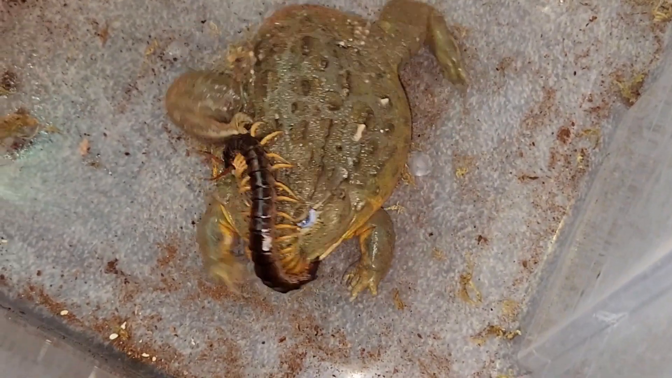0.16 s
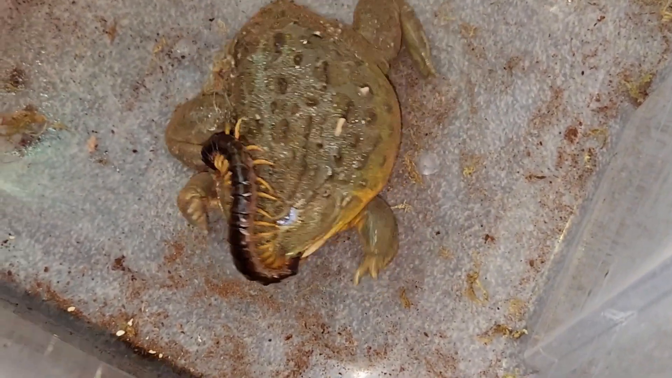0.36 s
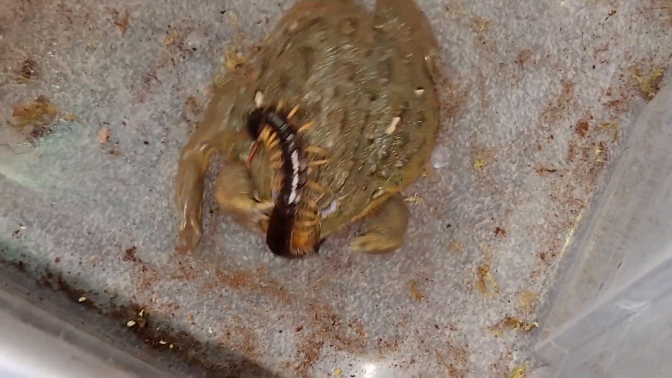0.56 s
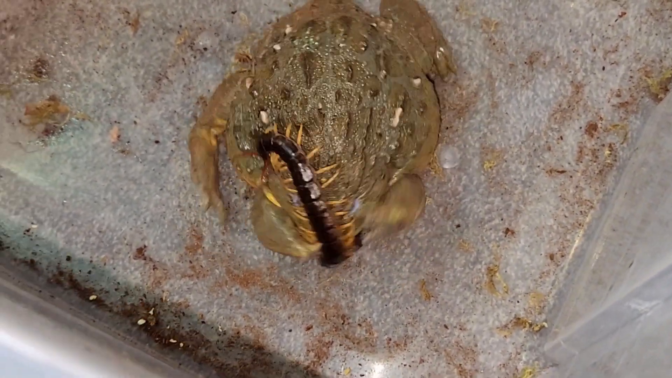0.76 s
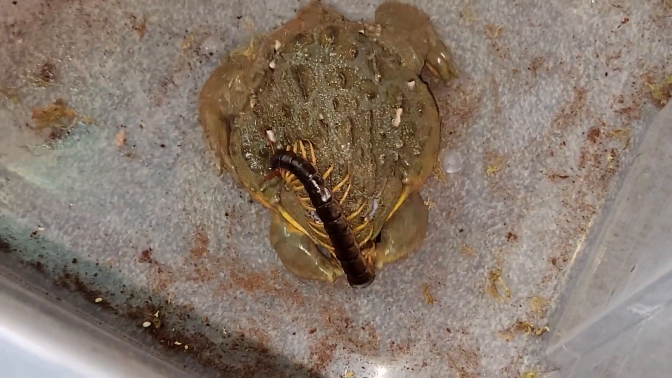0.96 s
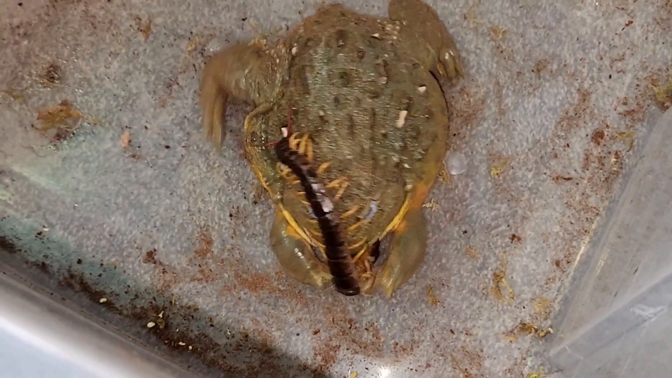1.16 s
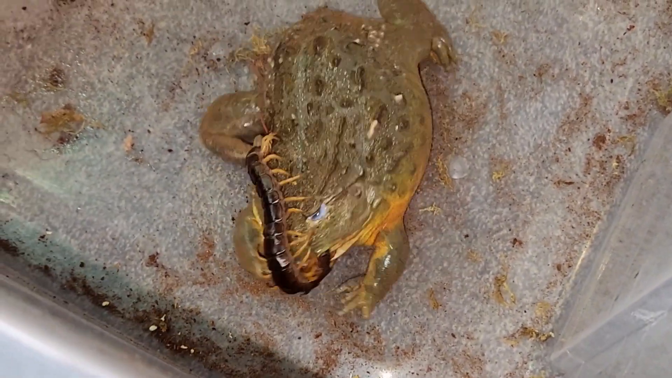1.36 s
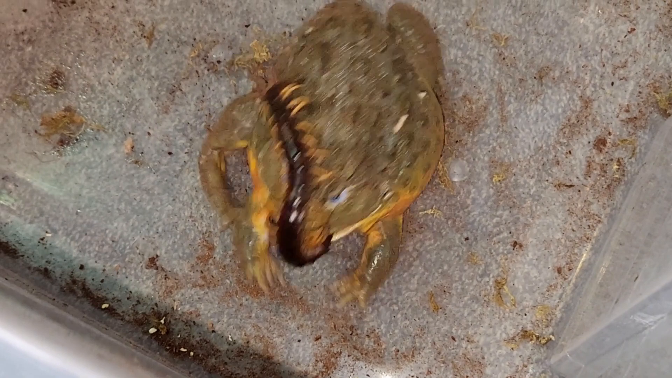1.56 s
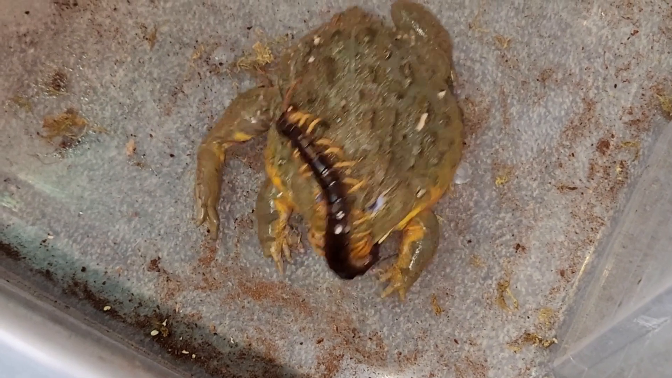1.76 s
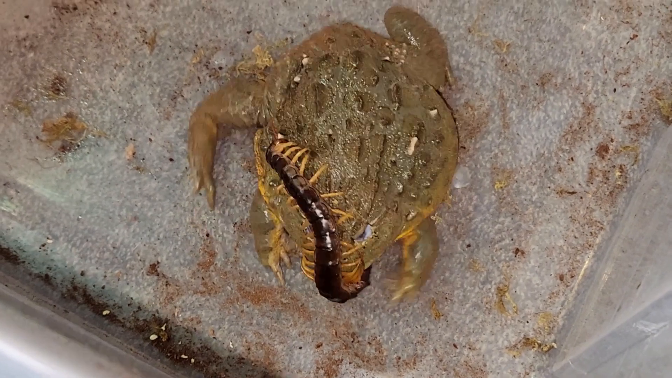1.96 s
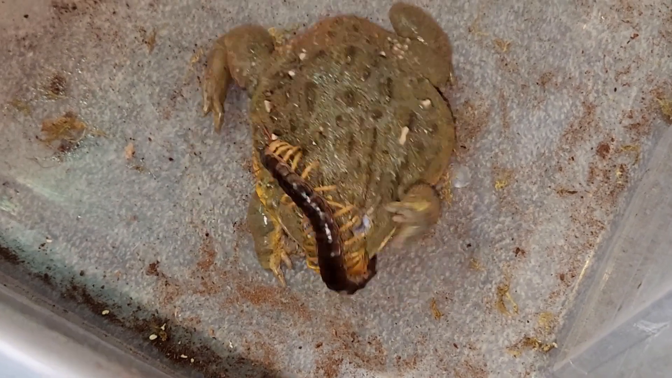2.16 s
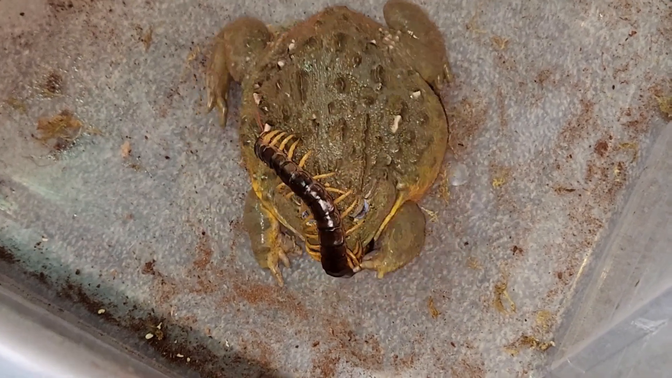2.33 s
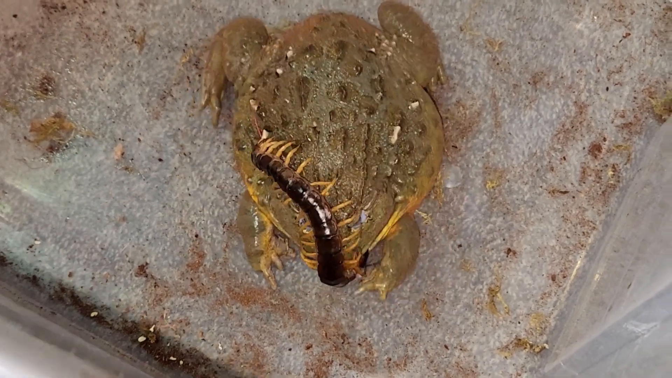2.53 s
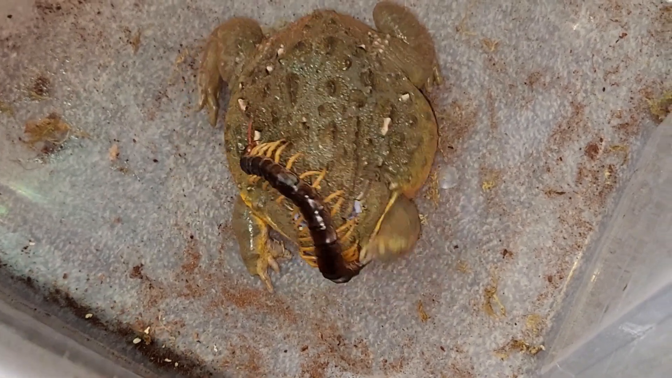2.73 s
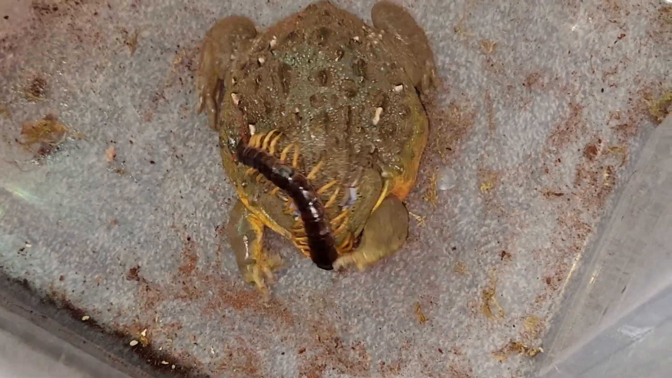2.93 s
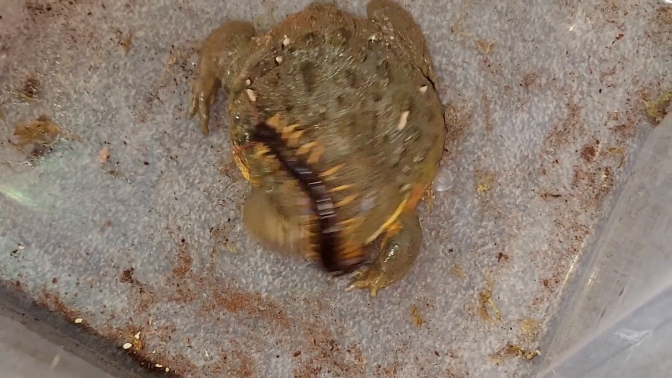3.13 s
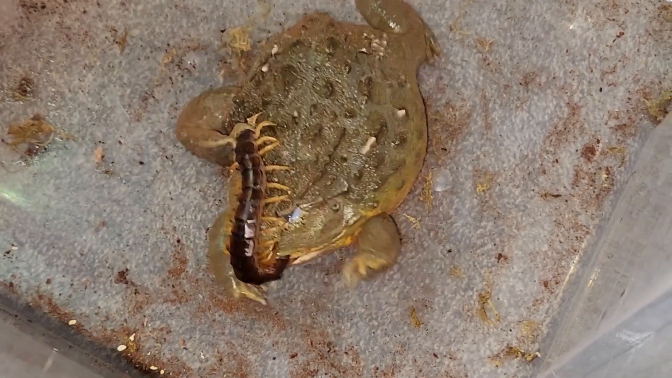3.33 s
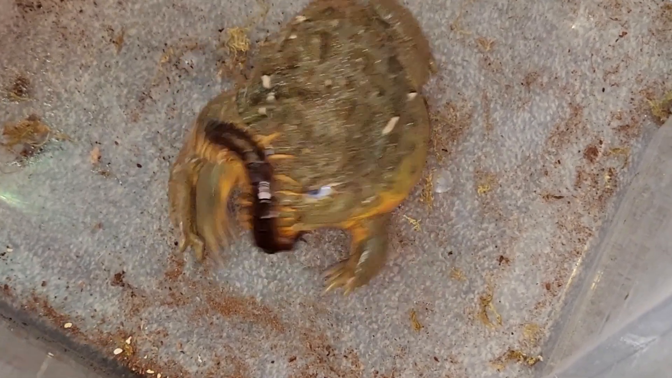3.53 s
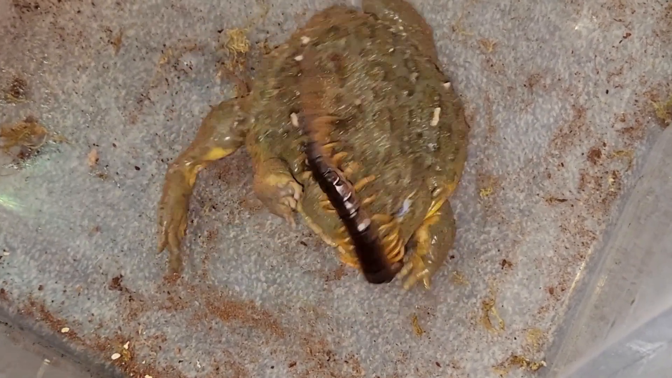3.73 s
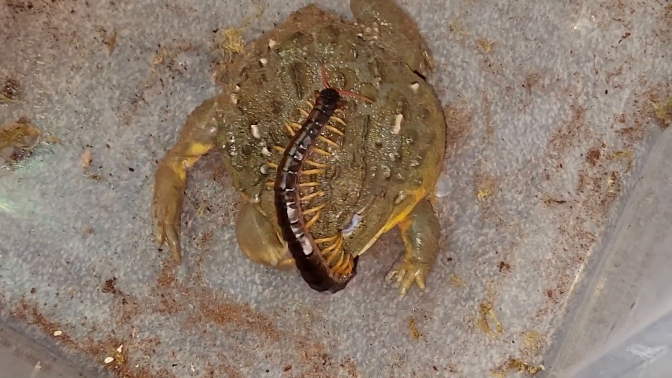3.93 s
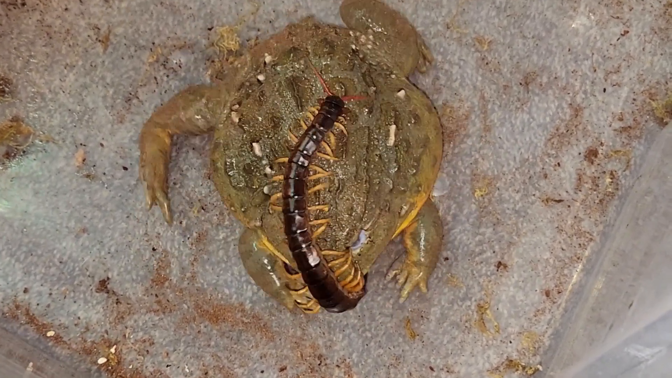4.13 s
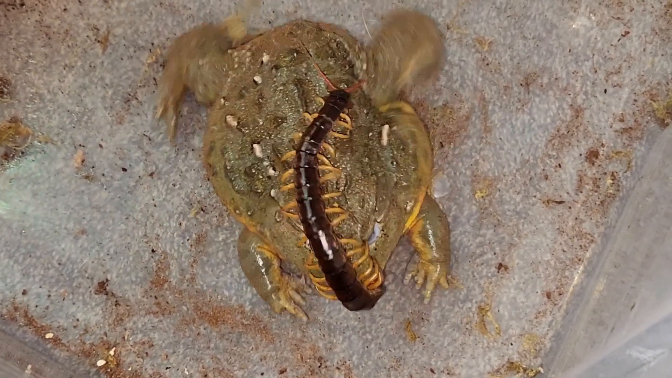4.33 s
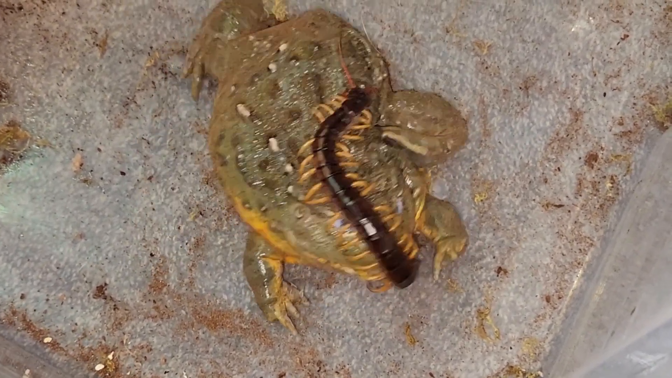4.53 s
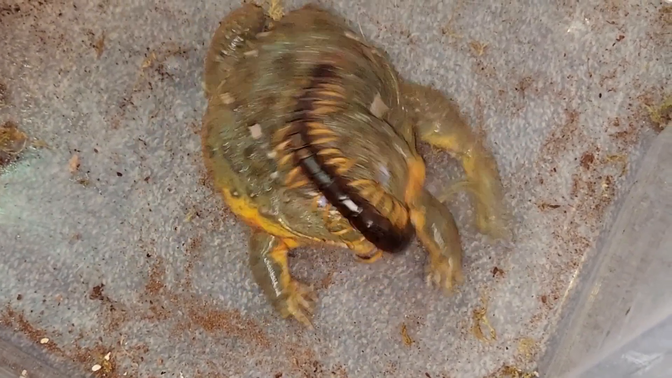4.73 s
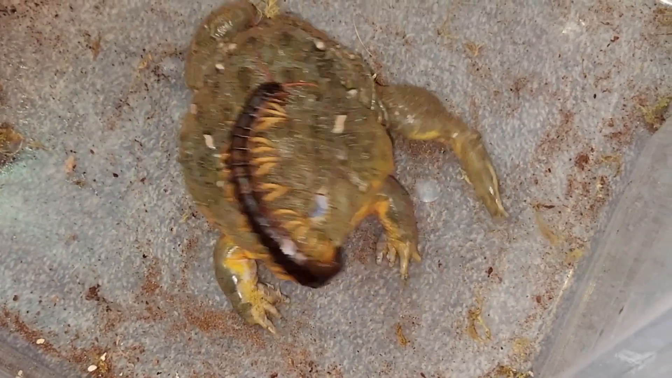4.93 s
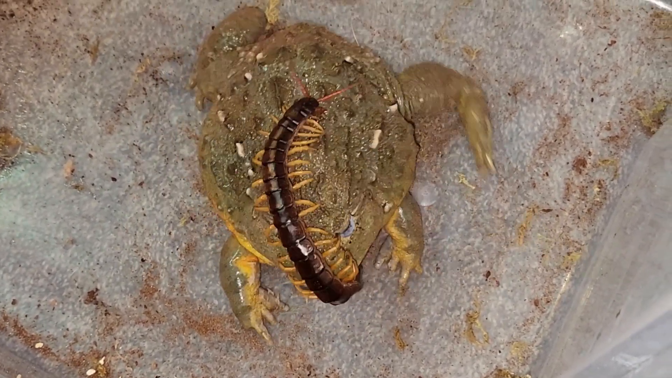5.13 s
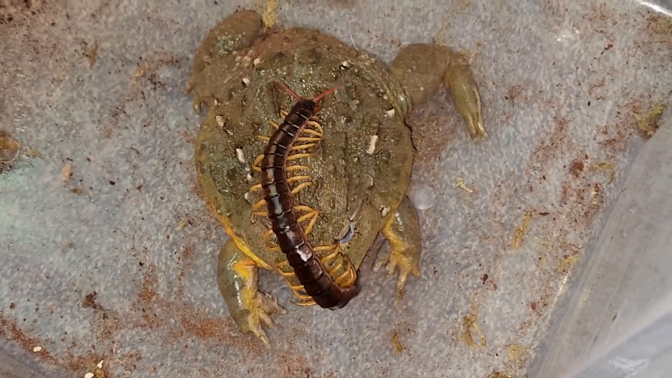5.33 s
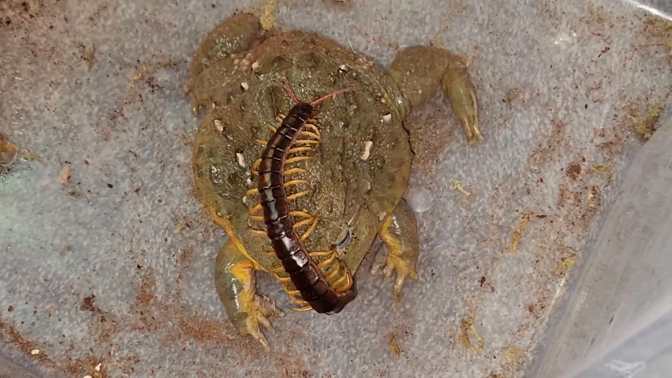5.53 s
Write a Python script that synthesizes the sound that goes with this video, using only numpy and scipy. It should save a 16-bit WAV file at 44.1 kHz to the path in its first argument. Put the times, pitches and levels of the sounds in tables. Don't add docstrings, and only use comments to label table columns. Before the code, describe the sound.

Close phone sound of a frog's body bumping a thin plastic floor: low, boxy, quickly damped thuds with crisp limb slaps, toe ticks, cracking grit and damp skin rasps. Activity comes in three uneven flurries separated by near-quiet with soft handling rumble. A distant machine hums very low, slightly clearer towards the end. Small enclosed space, short wall reflection, no voice.

```python
import sys
import numpy as np
from scipy import signal
from scipy.fft import rfft, irfft, next_fast_len
from scipy.io import wavfile
from scipy.ndimage import uniform_filter1d

SR = 44100
rng = np.random.default_rng(int(sys.argv[2]) if len(sys.argv) > 2 else 0)


def file_out(sig):
    cols = np.atleast_2d(sig).T
    lim = np.clip(cols, -1, 1)
    pcm = np.round(lim * 32767).astype(np.int16)
    wavfile.write(sys.argv[1], SR, pcm)


def boost_factor(decibels):
    exponent = np.asarray(decibels, float) / 20
    return 10 ** exponent


N = 250929

# freq_hz, density_db
SHUT_FLOOR = [(90, -32), (130, -5), (165, -17), (222, -7.5), (300, -11), (450, -13), (600, -16.5),
              (860, -13), (2000, -25.5), (6500, -30), (7900, -28.5), (8800, -38.5), (9400, -51.5),
              (10800, -50.5), (11700, -26.5), (12800, -22.5), (13800, -33.5), (15500, -32.5)]
SHUT_FLOOR_DB = -69.5

# time_s, pitch_hz, level_db
LOWER_HUM = [(0, 69.9, -64), (.5, 71.42, -54.5), (.7, 70.04, -58.5), (.93, 69.24, -50.5),
             (1.15, 68.7, -53.5), (1.25, 70.62, -57), (1.8, 68.84, -59), (2.55, 67.44, -68),
             (3.0, 70, -66.5), (4.08, 67.04, -58.5), (4.3, 67.8, -48.5), (4.63, 67.33, -52),
             (4.85, 68.64, -43), (5.04, 66.85, -52), (5.17, 69.3, -48.5), (5.39, 67.34, -44.5),
             (5.69, 67.9, -47.5)]
UPPER_HUM_HZ, UPPER_WAVER_RAD = 109, 0.4
UPPER_START_S, UPPER_RISE_S, UPPER_FROM_DB, UPPER_DB = 4.05, 0.47, -62, -52
DRONE_DB, DRONE_OVER_HUM_DB, RUMBLE_DB = -65, -11.5, -61

# middle_s, length_s, level_db, casing_hz
GRIPS = [(0, 0.17, -53, 92), (.18, 0.11, -50, 45.4), (0.313, 0.073, -42.5, 60.6), (0.664, 0.09, -52, 70.6),
         (1.483, 0.16, -69, 36), (1.877, 0.18, -42.5, 53.3), (1.994, 0.14, -46, 60), (2.096, 0.12, -46, 42),
         (2.266, 0.074, -49.5, 76), (2.201, 0.25, -48, 56), (2.423, 0.16, -51, 39.8),
         (3.757, 0.55, -52.5, 62.2), (5.006, 0.2, -59, 47.3), (5.308, 0.15, -57, 36.4)]
GRIP_RUMBLE_DB, GRIP_DRONE_DB, GRIP_LEFT_DB = -6.5, -12.5, -7

# freq_hz, density_db
OPEN_HISS = [(1500, -25.5), (2800, 4.5), (3500, 3), (4500, 3), (6500, -2), (7600, 4), (8500, -3),
             (10200, -5), (11600, 1.5), (15000, 2.5), (16200, -14.5)]

# freq_hz, likeness_share
PORT_LIKENESS = [(200, 0.9), (700, 0.79), (1100, 0.11), (1700, 0.058), (6000, 0.03), (8000, 0.585),
                 (11000, 0.48), (12500, 1), (15000, .85)]
# freq_hz, left_minus_right_db
PORT_TILT = [(100, 1), (400, 2), (1000, 2.5), (2000, -1), (2600, 6.5), (4500, 1), (8000, 11), (9800, 9),
             (11500, 6), (15000, 0)]

# time_s, gain_db
WALL_ECHO = [(0, -9.5), (1, -8), (2, -17), (3.5, -23), (5.69, -16.5)]
WALL_MS = 1.474

# middle_s, length_s, level_db, pitch_hz
RASPS = [(.06, .15, -54, 872), (.11, .14, -59, 2340), (0.266, .11, -59, 2730), (0.281, 0.12, -57, 890),
         (.76, .17, -64.5, 315), (0.883, 0.05, -47, 796), (0.915, .11, -60, 2600), (.921, .041, -50, 7310),
         (1.057, 0.15, -68, 326), (1.548, .051, -55, 14100), (1.562, 0.05, -48, 610),
         (1.601, 0.053, -56, 1400), (1.719, .09, -62.5, 270), (1.938, 0.19, -61, 1160),
         (2.093, .09, -64.5, 905), (3.171, 0.1, -58, 180), (3.23, .11, -60, 705), (3.277, 0.063, -59, 3110),
         (3.723, .14, -58.5, 212), (4.335, 0.17, -49.5, 795), (4.333, 0.15, -65, 4510),
         (4.35, 0.15, -52.5, 1480), (4.36, 0.095, -60, 3040), (4.421, .11, -57, 530),
         (4.433, 0.038, -63, 3210), (4.49, 0.15, -54, 5250), (4.86, .14, -53.5, 1570),
         (4.956, 0.12, -65, 460), (5.11, .13, -69, 2930), (5.218, 0.15, -47, 266),
         (5.225, 0.18, -56.5, 547), (5.21, 0.18, -60, 2200), (5.551, .12, -55.5, 1670),
         (5.554, .08, -74, 7900), (5.571, .021, -65, 12910), (5.58, 0.11, -60, 970),
         (5.577, 0.12, -61.5, 2265), (5.585, .031, -75, 8810), (5.591, 0.12, -77, 12610),
         (5.592, .11, -76, 6100), (5.606, .06, -72, 4810)]
RASP_WIDTH_SHARE = 0.19

# start_s, hold_s, drag_db, grit_over_drag_db, hiss_db
KICKS = [(.255, 0.049, -57.5, 0.5, -59.5), (.352, 0.035, -50.5, 3, -58), (.465, 0.038, -60.5, 7, -59.5),
         (.54, 0.022, -47, 3, -54), (.705, 0.022, -66, 5, -62.5), (.845, 0.11, -55, 3, -59),
         (1.24, 0.059, -53, 1.5, -60.5), (1.36, 0.04, -58.5, 3, -62.5), (1.495, 0.1, -53, 1.5, -58.5),
         (1.61, 0.095, -52, 1.5, -62), (3.03, .04, -57.5, -6, -65.5), (3.13, 0.013, -58.5, -8, -76.5),
         (3.195, 0.085, -55.5, -1.5, -63.5), (3.3, 0.037, -59, 2.5, -60.5), (3.462, 0.016, -52, -15, -64),
         (3.51, 0.038, -48.5, 1, -55.5), (3.64, 0.054, -58, 3, -59.5), (3.74, 0.048, -65, 2.5, -66.5),
         (4.275, .12, -48.5, -14, -61.5), (4.42, 0.081, -57.5, 6, -59.5), (4.762, 0.051, -57, 9, -53.5),
         (4.89, 0.02, -53.5, -3, -59.5), (5.16, 0.1, -55, 2, -65.5), (5.52, 0.11, -68, 7, -95)]
KICK_RISE_DB_PER_S, KICK_FALL_DB_PER_S = 402.5, 421.5
# start_s, hold_s, drag_db, grit_over_drag_db, hiss_db
SLIDES = [(0, 0.034, -49, -1.5, -59.5), (.09, .08, -53.5, 6.5, -60), (.57, 0.044, -54, 2.5, -63),
          (1.09, 0.052, -60.5, 1.5, -66), (1.88, 0.15, -60.5, 0.5, -65), (2.06, 0.06, -54.5, -12, -69),
          (2.2, 0.32, -91, 0, -81), (2.95, 0.08, -70.5, 3.5, -73), (2.38, 0.03, -69, -0.5, -74.5),
          (3.39, 0.017, -72, -3, -73.5), (3.59, 0.017, -59.5, 0, -62), (3.9, 0.095, -83.5, 7, -74),
          (4.04, 0.081, -60, -0.5, -67), (.76, 0.027, -66.5, 3.5, -67.5), (4.97, 0.089, -62.5, -4, -71.5),
          (1.32, 0.015, -58.5, -1, -65.5), (4.6, 0.0067, -63, -2.5, -68), (4.69, 0.076, -55.5, -2.5, -62.5),
          (4.83, 0.054, -59.5, 0.5, -68), (5.09, 0.079, -55, -1, -68)]
SLIDE_RISE_DB_PER_S, SLIDE_FALL_DB_PER_S = 154, 193
REST_DRAG_DB, REST_GRIT_DB, REST_WEIGHT_DB, REST_HISS_DB = -78.5, -77.5, -72, -79
WEIGHT_DB, WEIGHT_SHARE = 2.5, 0.18

# freq_hz, width_hz, level_db
RUBBED_MODES = [
    [(217.7, 37, 8.5), (284, 31, -7), (429, 110, 8)],
    [(574, 34, 1), (743.5, 53, 1.5), (879, 150, 7), (1020, 36, -16.5)],
    [(1490, 230, 1.5), (1670, 270, 13.5), (2150, 770, 9), (2770, 450, -21.5), (3200, 500, 0)],
]
# low_hz, high_hz
RUB_BANDS = [(150, 371.5), (430, 1120), (1050, 3280)]

# time_s, peak_db, ring_hz, snap_db, t60_ms
SLAPS = [(0.144, -42, 1500, -23, 49), (.356, -39, 1420, 11.5, 33), (0.4608, -21.5, 5600, -7, 25.4),
         (0.5432, -12, 1000, -3, 10.4), (0.5443, -13, 1840, -1.5, 10), (.549, -33, 1490, -2, 39),
         (1.268, -36, 590, -5.5, 55), (1.4805, -26, 2490, -8, 21), (1.537, -33, 1020, -6, 60),
         (1.633, -53, 1650, 12.5, 64), (1.678, -38, 1300, -7, 110), (1.699, -29.5, 1320, -19, 15),
         (3.026, -29.5, 1190, -16.5, 20.6), (3.315, -36.5, 755, -5, 34), (3.466, -37.5, 980, -13, 24),
         (3.51, -35.5, 4800, -4, 30), (3.515, -28.5, 880, -6.5, 53), (3.523, -37.5, 1650, -0.5, 29),
         (3.535, -40.5, 5500, -16, 57), (4.458, -31.5, 1330, -8, 17), (4.603, -37, 560, -30, 33),
         (4.736, -43.5, 2120, 10.5, 12), (4.761, -40, 1700, 2.5, 82), (4.771, -28, 540, -5.5, 31),
         (4.8, -41.5, 3740, -17, 48)]
RISE_SHARE = 0.03
SLAP_BRIGHT_DB = -23.5
# time_s, peak_db, ring_hz, bright_db
TOES = [(.523, -41, 960, -14), (0.827, -53, 1360, -26), (.855, -53, 750, 1), (.889, -46, 745, -7),
        (0.97, -58, 2350, -3), (1.183, -43.5, 2320, -16), (1.361, -39, 2660, -33), (1.475, -46, 2400, -28),
        (1.583, -39, 1400, -27), (2.39, -58, 600, -12), (3.135, -47, 1395, -27), (3.135, -54, 800, -30),
        (2.907, -66, 850, -12), (3.2, -44, 800, -22), (3.389, -49, 2300, -17), (3.494, -38.5, 2720, -7),
        (3.565, -36, 736, -26), (4.603, -42, 1280, -23), (5.521, -60.5, 5520, -27)]
TOE_SNAP_DB, TOE_T60_MS = -21, 22
# time_s, peak_db
GRIT = [(0.4616, -32.5), (.92, -51.5), (1.539, -45.5), (3.011, -58), (3.25, -55.5), (3.276, -55),
        (3.1992, -59), (4.802, -54), (0.669, -57.5), (0.703, -51), (0.719, -52.5), (0.738, -56.5),
        (.692, -69), (2.292, -58.5), (2.907, -65.5), (2.934, -66), (3.017, -53.5), (3.938, -62),
        (3.976, -64), (3.994, -57)]
GRIT_HZ, GRIT_SNAP_DB, GRIT_BRIGHT_DB, GRIT_T60_MS = 6060, -11, 2, 23
# low_hz, high_hz
TICK_BANDS = [(600, 4330), (5500, 13700)]

# time_s, peak_db, rocking_db, deep_db, upper_db
THUMPS = [(0.355, -38.5, -20, -10, 4), (0.46, -37, 0, -11, 2), (0.5237, -29.5, -22, -24, 4),
          (0.533, -24, 7, -3, 2), (0.546, -24, -4, 7, 9), (0.578, -51, -11, 4, 9),
          (1.268, -17, -2, 2.5, 7.5), (1.465, -33.5, -9, 12, 6), (1.537, -16, 6.5, 8, -3),
          (1.577, -29, -14, 18, -3.5), (1.679, -40.5, -13.5, -15, 3.5), (3.017, -44, -10, -5, 2.5),
          (3.0273, -12, -3, 6.5, 9), (3.313, -27.5, 4.5, 8, -11), (3.439, -22, -18, -11, 5),
          (3.465, -22.5, 5, 8.5, 9), (3.514, -12, 5.5, 10, 5), (3.56, -29.5, 16.5, 11, -3.5),
          (4.078, -41.5, -21, 15, 6), (4.604, -44.5, -20, -10, 38), (4.669, -44, -10, 21, 0),
          (4.7405, -25, -19, 7.5, -13.5), (4.7735, -21.5, -32, -25, 5), (4.888, -40.5, -14, 11, -7)]
# freq_hz, level_db, t60_s
ROCKING_MODES = [(85.1, -8.5, 0.38)]
# freq_hz, level_db, t60_s
DEEP_MODES = [(135.7, -2, .18), (107.7, -16.5, 0.3)]
# freq_hz, level_db, t60_s
MAIN_MODES = [(205.4, 14.5, 0.069), (220, -23.5, .08)]
# freq_hz, level_db, t60_s
UPPER_MODES = [(262, -16, 0.2), (325.4, -16, 0.15), (389.5, 1, 0.063), (460, -8.5, 0.035),
               (540, -13, 0.026), (823, -37, 0.036)]
BLOW_LAG_MS = 1.13
CONTACT_MS, SHORTER_MS_PER_DB = 1.88, 0.07


def evened(x):
    return x / np.sqrt(np.mean(x ** 2) + 1e-20)


def read(points, hz):
    f, value = np.transpose(points)
    return np.interp(np.log(hz + 1), np.log(f + 1), value)


def curves(rows):
    s, *columns = np.transpose(rows)
    return [np.interp(np.arange(N) / SR, s, c) for c in columns]


def add(mix, s, sound):
    part = mix[..., round(s * SR):][..., :sound.shape[-1]]
    part += sound[..., :part.shape[-1]]


def band(x, lo_hz, hi_hz, order=2):
    sos = signal.butter(order, [lo_hz, min(hi_hz, .45 * SR)], "band", fs=SR, output="sos")
    return signal.sosfilt(sos, x)


def resonate(x, hz, width_hz):
    r = np.exp(-np.pi * width_hz / SR)
    return signal.lfilter([1 - r, 0, r - 1], [1, -2 * r * np.cos(2 * np.pi * hz / SR), r * r], x)


def noise(spectrum, patchy_db, size=512):
    frames, hz = 4 * N // size + 5, np.fft.rfftfreq(size, 1 / SR)
    a, b, c, d, patches = rng.standard_normal((frames, len(hz), 5)).T
    patches = uniform_filter1d(patches, size=8, axis=0)
    patches = evened(uniform_filter1d(patches, size=12, axis=1))
    z = np.array([a + 1j * b, c + 1j * d])
    z = z * boost_factor(read(spectrum, hz)[:, None] + patchy_db * patches)
    return evened(signal.istft(z, nperseg=size, noverlap=3 * size // 4)[1][:, :N])


def pair(a, b):
    same = np.clip(read(PORT_LIKENESS, np.fft.rfftfreq(len(a), 1 / SR)), 0, 1)
    return np.array([a, irfft(same * rfft(a) + np.sqrt(1 - same ** 2) * rfft(b), len(a))])


def patchy(x, depth_db):
    z = signal.stft(x, nperseg=1024)[2]
    field = uniform_filter1d(rng.standard_normal(z.shape[:0:-1]), size=6, axis=0)
    field = evened(uniform_filter1d(field, size=3, axis=1))
    return signal.istft(z * boost_factor(depth_db * field.T), nperseg=1024)[1][:, :N]


def shut_floor():
    left, right = boost_factor(SHUT_FLOOR_DB) * noise(SHUT_FLOOR, patchy_db=-1.5, size=1024)
    return np.array([left, .6 * right + 0.29 * pair(left, right)[1]])


def machine_hum(lower_hz, lower_db):
    t = np.arange(N) / SR
    waver = uniform_filter1d(rng.standard_normal(N), size=5000)
    waver = evened(uniform_filter1d(waver, size=5000))
    lower = boost_factor(lower_db) * np.sin(2 * np.pi * np.cumsum(lower_hz) / SR)
    upper_db = np.interp(t - UPPER_START_S, [0, UPPER_RISE_S], [UPPER_FROM_DB, UPPER_DB])
    upper = np.sin(2 * np.pi * UPPER_HUM_HZ * t + UPPER_WAVER_RAD * waver)
    return np.sqrt(2) * (lower + boost_factor(upper_db) * (t > UPPER_START_S) * upper)


def hand_and_drone(lower_db):
    t = np.arange(N) / SR
    squeeze, casing = np.zeros((2, N))
    for s, length_s, db, hz in GRIPS:
        bump = boost_factor(db) * np.cos(np.pi * np.clip((t - s) / length_s, -.5, .5)) ** 2
        squeeze += bump
        casing += bump * np.sin(2 * np.pi * hz * (t - s))
    hand = evened(band(rng.standard_normal((3, N)), 28, 55))
    drone = evened(band(rng.standard_normal((2, N)) + 2.0 * rng.standard_normal(N), 75, 113.2))
    hand_gain = boost_factor(RUMBLE_DB) + boost_factor(GRIP_RUMBLE_DB) * squeeze
    drone_gain = boost_factor(DRONE_DB) + boost_factor(lower_db + DRONE_OVER_HUM_DB) + boost_factor(GRIP_DRONE_DB) * squeeze
    flex = np.sqrt(2) * boost_factor([[GRIP_LEFT_DB], [-GRIP_LEFT_DB / 2]]) * casing
    rumble = hand_gain * boost_factor([[GRIP_LEFT_DB], [0]]) * (1.25 * hand[0] + 0.71 * hand[1:])
    return flex + rumble + drone_gain * drone


def hiss(open_db):
    open_db = open_db - 2.5 * np.maximum(-76 - open_db, 0)
    flutter = evened(uniform_filter1d(rng.standard_normal(N), size=900))
    steady = patchy(pair(*noise(OPEN_HISS, patchy_db=1.5)), depth_db=2.0)
    return boost_factor(open_db + 5.5 + 1.1 * flutter) * steady


def rasps():
    out = np.zeros((2, N))
    draws = rng.standard_normal((len(RASPS), 3, 8000))
    for (s, length_s, db, hz), draw in zip(RASPS, draws):
        a, b, clumps = draw[:, :round(np.clip(length_s, .02, .18) * SR)]
        width_hz = min(RASP_WIDTH_SHARE * hz, 700)
        rub = pair(a, b) * boost_factor(2.8 * evened(uniform_filter1d(clumps, size=200)))
        squeak = evened(resonate(resonate(rub, hz, width_hz), hz, width_hz))
        add(out, s - length_s / 2, boost_factor(db) * np.hanning(len(a)) * squeak)
    return out


def strokes():
    t = np.arange(0, N / SR + .01, .002)
    rest_db = [[REST_DRAG_DB], [REST_GRIT_DB], [REST_WEIGHT_DB], [REST_HISS_DB]]
    power = boost_factor(rest_db) ** 2 + 0 * t
    kinds = ((KICKS, KICK_RISE_DB_PER_S, KICK_FALL_DB_PER_S),
             (SLIDES, SLIDE_RISE_DB_PER_S, SLIDE_FALL_DB_PER_S))
    for rows, rise, fall in kinds:
        for s, hold_s, drag_db, grit_db, hiss_db in rows:
            shape_db = -rise * np.maximum(s - t, 0) - fall * np.maximum(t - s - hold_s, 0)
            weight_db = drag_db + WEIGHT_DB + WEIGHT_SHARE * grit_db
            tops_db = [drag_db, drag_db + grit_db, weight_db, hiss_db]
            power = power + boost_factor(np.add.outer(tops_db, shape_db)) ** 2
    return curves(np.column_stack([t, *10 * np.log10(power)]))


def scuff(drag_db, grit_db, weight_db, slips_per_s=4000, spread_db=1.0):
    slips = (rng.random(N) < slips_per_s / SR) * boost_factor(spread_db * np.minimum(rng.exponential(1, N), 4))
    rub = (uniform_filter1d(slips, size=8) + .08) * rng.standard_normal((2, N))
    drive = patchy(pair(*rub), depth_db=3.6)
    ringing = [evened(sum(boost_factor(db) * resonate(drive, hz, width_hz) for hz, width_hz, db in modes))
               for modes in RUBBED_MODES]
    weight, drag, grit = (band(r, *edges, order=3) for r, edges in zip(ringing, RUB_BANDS))
    return boost_factor(weight_db) * weight + boost_factor(drag_db) * drag + boost_factor(grit_db) * grit


def ticks():
    out, t = np.zeros((2, N)), np.arange(3000) / SR
    rows = [(s, db, hz, snap_db, snap_db + SLAP_BRIGHT_DB, ms) for s, db, hz, snap_db, ms in SLAPS]
    rows += [(s, db, hz, TOE_SNAP_DB, bright_db, TOE_T60_MS) for s, db, hz, bright_db in TOES]
    rows += [(s, db, GRIT_HZ, GRIT_SNAP_DB, GRIT_BRIGHT_DB, GRIT_T60_MS) for s, db in GRIT]
    bursts = rng.standard_normal((len(rows), 2, len(t)))
    rattle = boost_factor(-22 - 60 * t / .09)
    for (s, db, hz, snap_db, bright_db, t60_ms), burst in zip(rows, bursts):
        decay = boost_factor(-60 * t * 1000 / max(t60_ms, 4)) + rattle
        shape = decay * np.minimum(t * 1000 / (RISE_SHARE * t60_ms + 0.067), 1)
        hit = pair(*burst) * shape
        hit[:, 10] += 40 / max(t60_ms, 4)
        width_hz = min(0.65 * hz, 2800)
        ring = resonate(resonate(hit, hz, width_hz), hz, width_hz)
        parts = [band(ring, hz / 2.5, 1.9 * hz, order=3)]
        parts += [band(hit, *edges, order=3) for edges in TICK_BANDS]
        ring, snap, bright = (p * np.linalg.norm(shape) / np.linalg.norm(p.mean(0)) for p in parts)
        add(out, s, boost_factor(db - 4.5) * (ring + boost_factor(snap_db) * snap + boost_factor(bright_db + 9.5) * bright))
    return out


def wall(x):
    gain, lag = boost_factor(curves(WALL_ECHO)[0]), round(WALL_MS * SR / 1000)
    treble = x - uniform_filter1d(x, size=41)
    echo = gain * np.roll(treble, lag, axis=1) + gain ** 2 * np.roll(treble, 2 * lag, axis=1)
    return (x + echo) / np.sqrt(1 + gain ** 2)


def mode_ring(modes, t):
    return sum(boost_factor(db - 60 * t / t60_s) * np.sin(2 * np.pi * hz * t) / hz for hz, db, t60_s in modes)


def thumps():
    out, t = np.zeros(N), np.arange(SR // 3) / SR
    rock, deep = mode_ring(ROCKING_MODES, t), mode_ring(DEEP_MODES, t)
    main, upper = mode_ring(MAIN_MODES, t), mode_ring(UPPER_MODES, t)
    for s, db, rock_db, deep_db, upper_db in THUMPS:
        ring = boost_factor(rock_db) * rock + boost_factor(deep_db) * deep + main + boost_factor(upper_db) * upper
        contact_ms = max(CONTACT_MS - SHORTER_MS_PER_DB * upper_db, .3)
        push = np.exp(-.5 * ((t[:600] * 1000 - 2 * contact_ms) / (contact_ms / 2)) ** 2)
        blow = band(signal.fftconvolve(ring, np.diff(push))[:len(t)], 97, 4000)
        add(out, s + BLOW_LAG_MS / 1000 - contact_ms / 1500, boost_factor(db) * blow / abs(blow).max())
    return out


def scene():
    lower_hz, lower_db = curves(LOWER_HUM)
    background = shut_floor() + machine_hum(lower_hz, lower_db) + hand_and_drone(lower_db)
    drag_db, grit_db, weight_db, open_db = strokes()
    contacts = wall(ticks() + scuff(drag_db, grit_db, weight_db))
    blows = thumps()
    far_port = blows + boost_factor(-15) * (np.roll(blows, shift=40) - blows)
    return background + hiss(open_db) + rasps() + contacts + np.array([blows, far_port])


def top_cut(x):
    return signal.sosfilt(signal.butter(12, 16640, fs=SR, output="sos"), x)


def record(dry):
    size = next_fast_len(N + 4096)
    hz = np.fft.rfftfreq(size, 1 / SR)
    half = boost_factor(read(PORT_TILT, hz) / 2)
    edge = np.clip((16000 - hz) / 150, 0, 1)
    ports = irfft(rfft(dry, size) * edge * np.array([half, 1 / half]), size)[:, :N]
    return top_cut(ports)


dry = scene()
out = record(dry)
file_out(out)
```